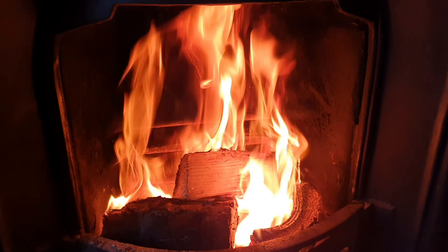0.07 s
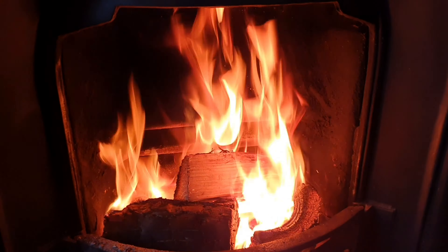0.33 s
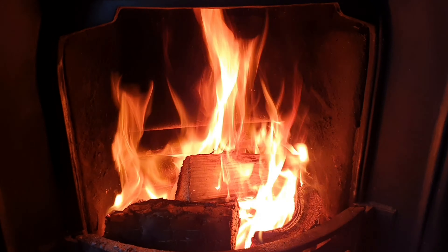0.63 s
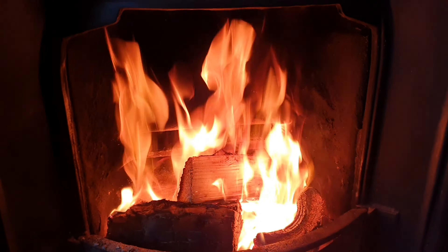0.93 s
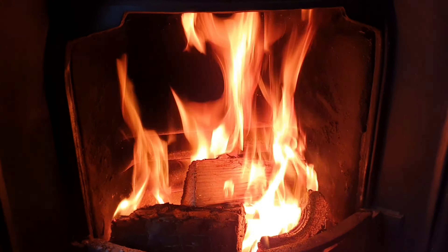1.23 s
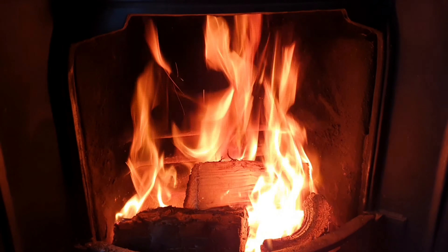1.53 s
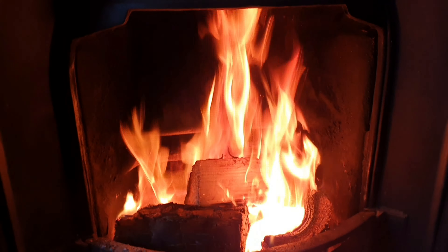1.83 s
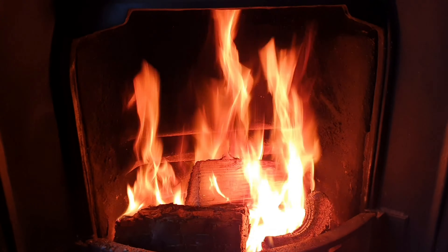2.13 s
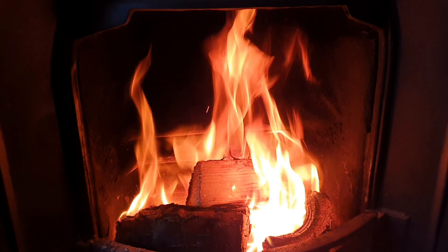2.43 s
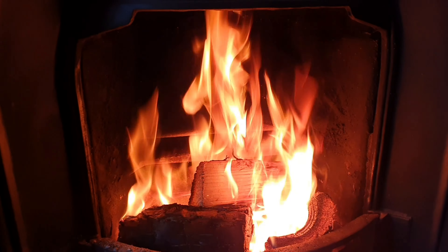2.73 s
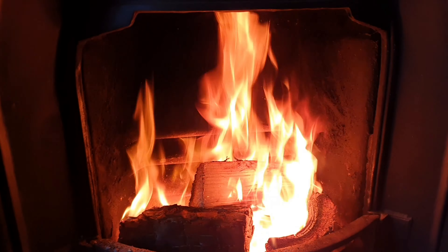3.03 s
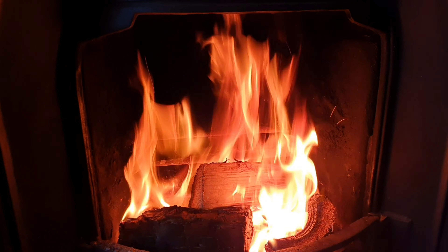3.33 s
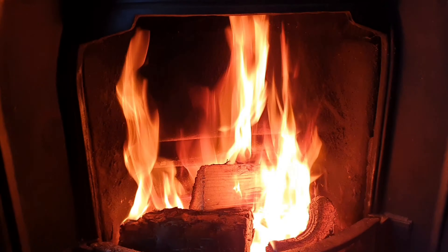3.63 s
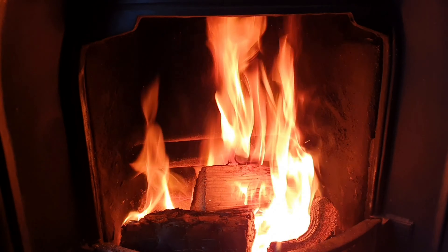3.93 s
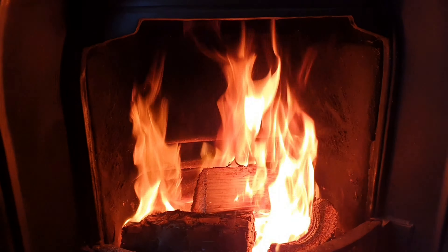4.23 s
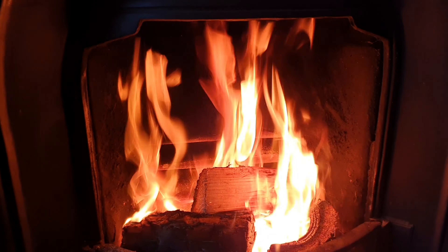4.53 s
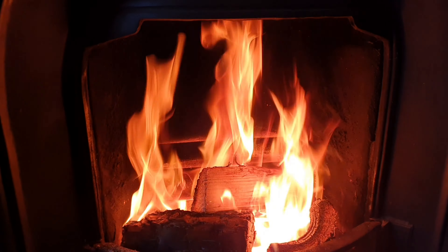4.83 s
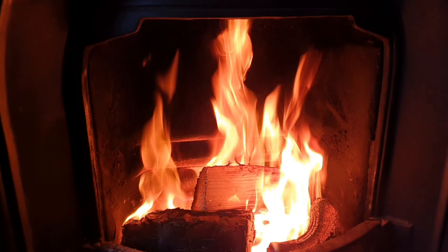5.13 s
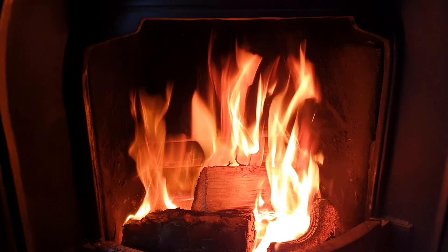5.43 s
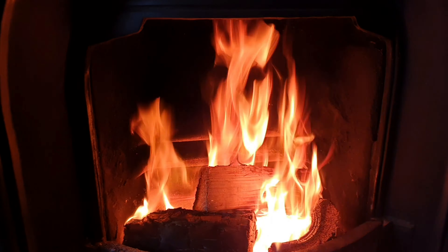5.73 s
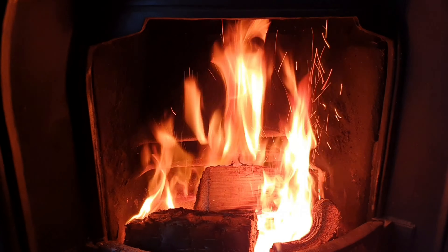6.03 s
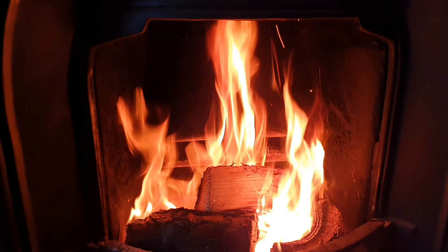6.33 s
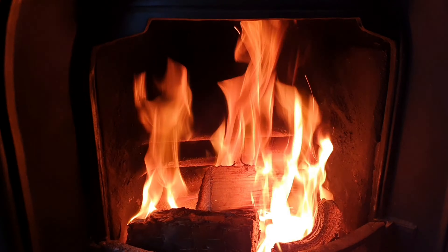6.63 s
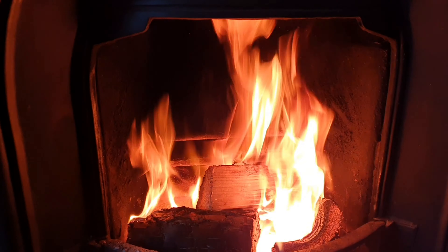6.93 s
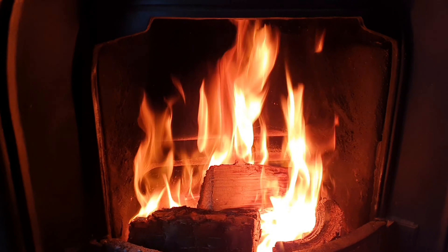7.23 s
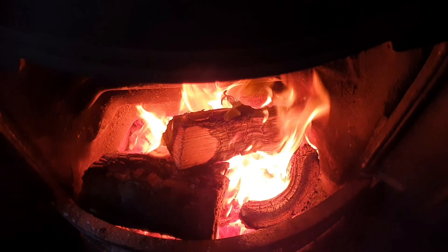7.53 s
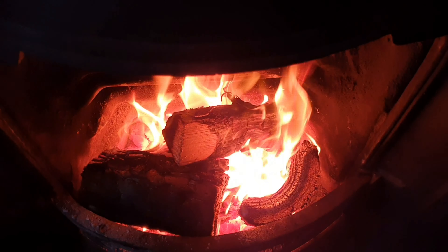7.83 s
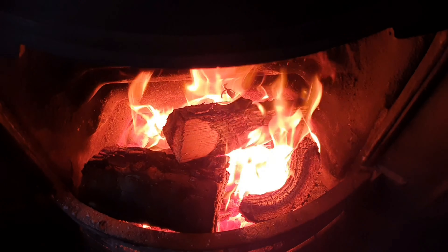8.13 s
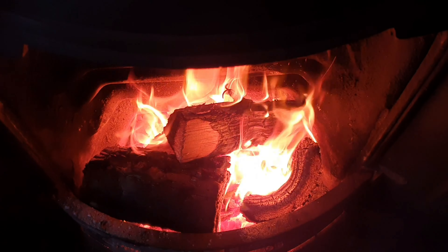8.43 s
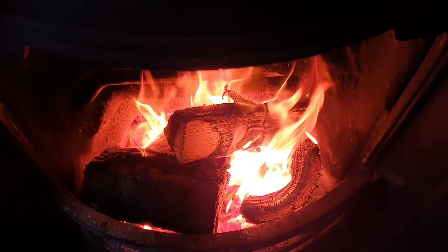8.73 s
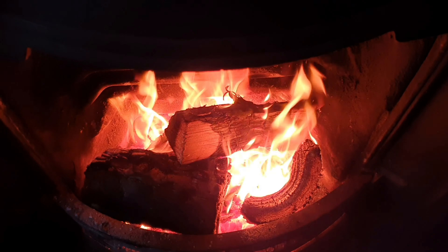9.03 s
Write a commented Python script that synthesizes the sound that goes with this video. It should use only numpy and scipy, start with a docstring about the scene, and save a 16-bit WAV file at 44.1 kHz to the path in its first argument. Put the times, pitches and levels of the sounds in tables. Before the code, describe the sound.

A log fire burns in a small iron fireplace, heard close by in a living room for about nine seconds. A soft, low rumble of flames flutters throughout, swelling in gentle whoomps, most clearly between 3.3 and 3.9 seconds. Above it are a faint hiss and the fine sizzle of sap. Short, bright cracks come irregularly from the left with a little room reverberation, standing out around 0.7, 1.6, 3 and 3.8 seconds; some have a tiny woody ring. At about 5.8 seconds comes a sharp double pop, by far the loudest sound. Lighter crackles follow, with a flare near 6.8 seconds and another clear crack at 7.4. At 7.6 seconds the sound drops out for an instant. The fire then continues quieter and duller, with a few small cracks and a soft flare near 8.8 seconds.

```python
"""Logs burn in a small iron fireplace, heard from close by in a living room.
Turbulent flames excite the air resonances of the firebox, so it rumbles under their flutter. Pockets of
steam burst in the wood as a fine sizzle, sharp cracks and one loud double pop; splinters ring as they
split off. The cracks come from the left and reverberate in the room.
Near the end, after a brief dropout, the fire sounds quieter and duller."""
import sys
import numpy as np
from scipy import signal
from scipy.fft import rfft, irfft, next_fast_len
from scipy.io import wavfile
from scipy.ndimage import uniform_filter1d, minimum_filter1d

SR = 44100
rng = np.random.default_rng(int(sys.argv[2]) if len(sys.argv) > 2 else 0)


def persist_wave(psi):
    """Save psi, clipped to +-1, as 16-bit WAV."""
    counts = np.round(np.clip(psi, -1, 1) * 32767).astype(np.int16)
    wavfile.write(sys.argv[1], SR, np.atleast_2d(counts).T)


N = 408789
TIME = np.arange(N) / SR
DROPOUT_AT_S, DROPOUT_LENGTH_S = 7.597, .011

# steam pockets bursting in the wood: (time [s], level referred to 1 ms [dB], tilt [dB/octave],
# decay time of the tearing [ms], centre of a broad lift in the crack's tone [Hz], its gain [dB]);
# at 1500 Hz the lift gives bright cracks body
STEAM_BURSTS = [(0.1855, -46.5, 3.5, 1.3, 8800.0, 7), (0.3887, -35, 9.5, 1.4, 5600.0, 6),
                (0.4107, -39.5, 1.5, 1.7, 7700.0, 4), (0.4465, -43.5, 0.5, 1.6, 2100.0, 7.5),
                (0.528, -27, 10.5, 2.3, 13800.0, 0), (0.5889, -40, 6, 2.5, 1500.0, 3),
                (0.6716, -24.5, 2.5, 0.89, 13800.0, 2.5), (0.747, -43.5, 11, 1.8, 8100.0, 5),
                (0.9261, -34.0, 1, 2.1, 14500.0, 7), (0.9306, -32.5, 0.0, 1.7, 13800, 3),
                (1.003, -44, 1, 0.58, 8600, 14), (1.008, -41.5, -0.5, 1.3, 5600.0, 4),
                (1.1318, -33, 8, 0.98, 13300, 6.0), (1.298, -46, 2, 1.1, 10300.0, 5),
                (1.346, -46.5, 2.5, 5.2, 13800.0, 3), (1.4005, -39.5, 3, 1.7, 5400.0, 4),
                (1.4856, -33.5, 3.5, 2.1, 6960, 6), (1.52, -43, 5, 1.3, 9300.0, 4),
                (1.5815, -18.5, 5.5, 0.82, 3700.0, 0), (1.729, -45, 7, 1.4, 14500.0, 8.0),
                (1.742, -49, 4, 2.5, 4400.0, 5), (1.7753, -34.5, 3.5, 1.1, 14500.0, 6),
                (2.212, -45.5, 4, 2.9, 9400.0, 10), (2.2288, -31.5, 3.5, 2.9, 9000.0, 4),
                (2.446, -36.5, 4, 2.5, 10700, 4), (2.4934, -31.5, 5.5, 2.2, 3160, 6.5),
                (2.518, -42, 9, 1.5, 1800.0, 9), (2.542, -44, -2, 0.26, 6630, 6),
                (2.758, -43.5, 8, 6.6, 14000.0, 8), (2.9048, -42, 9, 6.5, 1500.0, 13),
                (3.0185, -23, 8.5, 2.6, 3900.0, 2.0), (3.118, -37.5, 13, 3.8, 1500.0, 5.0),
                (3.1443, -31.5, 1, 1.4, 13600.0, 6), (3.207, -43.5, 3, 1.4, 14500.0, 1),
                (3.4519, -33.5, 1.5, 1.4, 14500.0, 10), (3.587, -45.5, 4.5, 3, 7700.0, 8),
                (3.69, -46, 4, 2.4, 14500.0, 3.0), (3.7043, -36.5, 10, 2.4, 1500.0, 7.0),
                (3.78, -25, 12, 2.1, 1500.0, 9), (3.849, -24.5, 5.5, 1.16, 5170, -0.5),
                (4.031, -28.5, 6, 1.8, 2500.0, 1.5), (4.0826, -33, 4.5, 1, 9900, -1),
                (4.1853, -33.5, 2.5, 1.8, 13800.0, 5), (4.3652, -42.0, -3, 1.2, 6600, 6),
                (4.512, -34, 6.5, 2.1, 7440, 4.5), (4.549, -39.5, 7.5, 3.2, 9400.0, 4),
                (4.639, -44, 10.0, 3.6, 1800.0, 7), (4.6603, -37, 15.5, 2.1, 7300.0, -1),
                (4.967, -39.5, 9.5, 4.1, 6130, 4.0), (5.049, -44, 8.5, 3.3, 1500.0, 4.0),
                (5.2035, -40.5, 5.5, 3.0, 14200.0, 8.0), (5.214, -43, 5, 2.5, 6800.0, 4.0),
                (5.273, -36.5, 9, 2.4, 9600, 7.5), (5.3472, -47.5, -2, 2.8, 13900.0, 9.0),
                (5.3909, -36.5, -1.0, 0.9, 6640, 2), (5.687, -28.5, 3.5, 2.2, 4900, 11.5),
                (5.705, -37.5, 5, 2, 4300.0, 10), (5.756, -42.5, 13.5, 1.5, 1500.0, 14),
                (5.818, 0, 3.5, 1.17, 3000.0, 3), (5.828, -16.5, 12, 3.8, 1700.0, 12.0),
                (5.8346, -14.5, 2.0, 15.4, 5700.0, 3.5), (5.9098, -3.5, 0.5, 0.55, 14630, 3.5),
                (6.1403, -34.5, 3, 1.85, 11100, 4), (6.2993, -50, 8, 3.9, 9680, 7),
                (6.3262, -44, 15, 3.2, 1500.0, 5), (6.49, -48.5, 1, 1.9, 7200.0, 7),
                (6.503, -47.5, 0.0, 1.64, 1510, 3.0), (6.5914, -39.5, 15, 4.9, 4550, 0),
                (7.0411, -43.0, 2.5, 2.5, 13700, 13.5), (7.3499, -43, 0.0, 3.2, 5040, 6),
                (7.378, -21, 3.0, 1.34, 12200, 3.5), (7.3914, -30, 0.5, 0.71, 5900.0, 4.0),
                (7.5742, -42.5, 8, 0.63, 1500.0, 21), (7.5938, -42, -3, 0.11, 13060, 11),
                (8.1055, -38.5, 7.5, 1.7, 3200.0, 12), (8.1923, -51.0, -1.5, 3, 8790, 4.0),
                (8.3043, -34.0, 15.5, 2.4, 1500.0, 4), (8.8097, -48.0, 1.5, 1.9, 6480, 11),
                (8.841, -50, -0.5, 4.7, 3980, 5.5), (8.8872, -42, 6, 0.89, 14500.0, 10)]
# spectrum of fluttering flames: (frequency [Hz], relative level [dB])
FLUTTER_SPECTRUM = [(150, -13.5), (260, -8), (300, -5.5), (350, 2), (440, -4.5), (560, -9.5), (780, -12.5),
                    (1100, -21.5), (2000, -27.5), (4000, -39.5), (9000, -54.5)]


def from_db(db):
    """Amplitude ratio of a level in decibels."""
    return 10 ** (np.asarray(db) / 20)


def unit_rms(x):
    """Normalisation to an rms of 1."""
    return x / np.sqrt(np.mean(x ** 2) + 1e-20)


def steadied(x, span_s):
    """Division by the running rms holds a stereo sound's short-time level near 1."""
    return x / np.sqrt(uniform_filter1d(np.mean(x ** 2, axis=0), int(span_s * SR)) + 1e-20)


def in_time(rows):
    """Linear interpolation of a curve at every sample."""
    return np.interp(TIME, *np.transpose(rows))


def at_hz(points, hz):
    """Interpolation on a logarithmic frequency axis."""
    known_hz, values = np.transpose(points)
    return np.interp(np.log(np.maximum(hz, 1)), np.log(known_hz), values)


def bins(size):
    """Frequencies of the Fourier transform of `size` samples."""
    return np.fft.rfftfreq(size, 1 / SR)


def colour(x, spectrum):
    """Minimum-phase filtering: folding the cepstrum gives a causal response with this spectrum."""
    cepstrum = irfft(np.log(from_db(at_hz(spectrum, bins(2048)))))
    fold = np.r_[1, np.full(1023, 2), 1, np.zeros(1023)]
    response = irfft(np.exp(rfft(cepstrum * fold)))
    return signal.oaconvolve(x, response[None], axes=-1)[:, :x.shape[-1]]


def pan(db):
    """Constant-power gains for a level difference of left over right."""
    ratio = from_db(db)
    return np.array([ratio, np.ones_like(ratio)]).reshape(2, -1) / np.sqrt(1 + ratio ** 2)


def drift(corner_hz):
    """Low-passed noise: a slow random fluctuation of unit rms."""
    step, settle = 40, 2000
    pole = np.exp(-2 * np.pi * corner_hz * step / SR)
    white = rng.standard_normal(N // step + settle + 2)
    slow = signal.lfilter([1], [1, -2 * pole, pole * pole], white)[settle:]
    return np.interp(np.arange(N) / step, np.arange(len(slow)), unit_rms(slow))


def air_noise():
    """Interaural coherence: noise alike at both ears in the bass, largely unrelated in the treble."""
    # likeness of the two ears' signals: (frequency [Hz], coherence [0-1])
    coherence = [(60, 1), (180, 1), (290, 0.96), (640, 0.4), (1400, 0.27), (3000, 0), (15000, 0.3)]
    # balance between the ears: (frequency [Hz], left over right [dB])
    balance = [(60, 1.2), (120, 1.2), (250, 3.1), (700, 2), (2400, 2.2), (8000, 4.3)]
    size = next_fast_len(N, True)
    mid, side = rfft(rng.standard_normal((2, size)))
    hz = bins(size)
    alike = np.clip(at_hz(coherence, hz), 0, .995)
    ears = np.sqrt(1 + alike) * mid + np.sqrt(1 - alike) * side * [[1], [-1]]
    return irfft(ears * pan(at_hz(balance, hz)))[:, :N]


def firebox(x, band_hz=(41, 270)):
    """Cavity resonance: the low modes of the enclosed air respond as parallel damped resonators."""
    # air modes of firebox and room: (frequency [Hz], bandwidth [Hz], gain [dB])
    air_modes = [(46.3, 12, -6.5), (69, 10, 1.5), (84, 12, -5), (114.6, 18, -7.5), (149.6, 16, -11.5),
                 (166, 17, -12.5), (200.6, 12, -13), (225, 19, -16)]
    out = 0
    for k, (hz, width_hz, db) in enumerate(air_modes):
        radius = np.exp(-np.pi * width_hz / SR)
        forward = np.array([1, 0, -1]) * (1 - radius ** 2) / 2
        feedback = [1, -2 * radius * np.cos(2 * np.pi * hz / SR), radius ** 2]
        out = out + (-1) ** k * from_db(db) * signal.lfilter(forward, feedback, x)
    return signal.sosfilt(signal.butter(2, band_hz, "band", fs=SR, output="sos"), out)


def draught(roar_share=.73, waver_db=0.53, rise_s=0.049, fall_s=0.05):
    """Amplitude modulation: levels [dB] of boom, roar and flutter waver and swell with each flare."""
    # strength of the draught through the flames: (time [s], level [dB])
    airflow = [(0.7, -45.5), (0.95, -48), (1.3, -45.5), (1.85, -42.5), (2.15, -47.5), (3.0, -44.5),
               (3.75, -50), (4.2, -45), (4.77, -52.5), (4.92, -43.5), (5.3, -43.5), (5.7, -45),
               (6.05, -43.5), (6.35, -55), (6.65, -53), (7.05, -53), (7.56, -43.5), (7.7, -58),
               (8.3, -58.5), (8.75, -52), (9.27, -54)]
    # fluttering of the flame tongues: (time [s], level [dB])
    tongues = [(0.5, -67.5), (1.05, -72), (1.4, -68), (2.3, -68.5), (3.0, -66), (3.35, -69.5), (4.1, -70),
               (4.75, -72.5), (5.3, -68.5), (5.57, -71.5), (6.4, -75), (7.0, -76), (7.55, -67),
               (7.75, -80.5), (8.4, -79), (8.85, -70.5), (9.27, -74.5)]
    # flares, each a soft whoomp: (time [s], boom gain [dB], roar gain [dB], flutter gain [dB])
    flares = [(.07, 6, 2.5, 2), (.31, 7, 2, 2.5), (.61, 7.5, 5.5, 7), (1.2, 0, 4.5, 7.5), (1.58, -1, 5, 7),
              (1.9, -2, 2, 3.5), (2.03, -5, 6, 5), (2.28, 5.5, 1, -3), (2.5, 8, -1, 2.5),
              (2.72, -4.5, 3, -0.5), (2.84, 7.5, 3.5, 1), (3.08, 6, -1.5, -6), (3.278, 9.5, 6, 1.5),
              (3.62, 9, 9, 7.5), (3.903, 9.5, 14, 9.5), (4.19, -14, 3.5, 8.5), (5.05, 3.5, -2.5, 8),
              (5.13, 4, 6, 7.5), (5.889, 8, 6.5, 2), (6.761, 5.5, 12, 8.5), (7.149, -2, 2, 0.5),
              (7.399, -5.5, 7.5, 2), (7.56, 2, 5, 3), (8.83, 6.5, 5.5, 1)]
    boom_db = in_time(airflow)
    roar_db = boom_db.mean() + roar_share * (boom_db - boom_db.mean())
    levels = np.array([boom_db, roar_db, in_time(tongues)]) + waver_db * drift(corner_hz=5.9)
    for s, *flare_db in flares:
        peak = int(s * SR)
        near = slice(max(peak - SR // 4, 0), peak + SR // 4)
        t = TIME[near] - s
        swell = np.exp(-(t / np.where(t < 0, rise_s, fall_s)) ** 2)
        levels[:, near] += np.outer(flare_db, swell)
    return levels


def flames(boom_gain_db=-2, roar_gain_db=-6, lumpy_db=2, flicker_db=2.5, split_hz=100):
    """Combustion noise: turbulent burning comes in lumps, driving a deep boom, a roar and a flutter."""
    lumps = drift(corner_hz=22)
    rumble = firebox(air_noise() * from_db(lumpy_db * lumps))
    crossover = [signal.butter(4, split_hz, kind, fs=SR, output="sos") for kind in ("low", "high")]
    boom, roar = (steadied(signal.sosfilt(band, rumble), span_s=0.18) for band in crossover)
    flutter = unit_rms(colour(air_noise(), FLUTTER_SPECTRUM) * from_db(flicker_db * lumps))
    boom_db, roar_db, flutter_db = draught()
    return (boom * from_db(boom_db + boom_gain_db) + roar * from_db(roar_db + roar_gain_db)
            + flutter * from_db(flutter_db))


def ticks(per_s, spread_db, decay_s, side_db, clump_db, low_hz, peak_db, high_hz=15000, scatter_db=4):
    """Shot noise: tiny bursts of random size and place arrive in clumps; the sum has unit rms."""
    # spectrum of boiling sap: (frequency [Hz], gain [dB])
    sap_spectrum = [(700, -13.5), (1500, -8.5), (2600, -13), (3700, -5), (4500, -16), (5600, -8.5),
                    (7500, -8.5), (9800, -2.5), (12000, -5.5), (14000, 0), (16000, -6)]
    born = rng.random(N) < per_s * from_db(clump_db * drift(corner_hz=8)) / SR
    sizes = from_db(spread_db * np.minimum(rng.exponential(1, N), 2.7)) * rng.choice([-1, 1], N)
    clicks = born * sizes * pan(side_db + scatter_db * rng.standard_normal(N))
    spot_count, out = 10, 0
    spot = rng.integers(0, spot_count, N)
    t = np.arange(256) / SR
    for k, hz in enumerate(np.linspace(low_hz, high_hz, spot_count)):
        # every spot on the logs favours its own pitch
        resonance = [(hz / np.sqrt(2), 0), (hz, peak_db), (hz * np.sqrt(2), 0)]
        tick = colour(rng.standard_normal((2, len(t))) * np.exp(-t / decay_s), resonance)
        out = out + signal.oaconvolve(clicks * (spot == k), unit_rms(tick), axes=-1)[:, :N]
    return unit_rms(colour(out, sap_spectrum))


def sizzle(tick_db=1, fizz_db=0.5, room_db=-7, vigour_share=0.35):
    """Boiling: sap bursts as ticks over a dense fizz; the harder it boils, the more they stand out."""
    # sap boiling out of the logs: (time [s], level [dB])
    boiling = [(0, -70), (0.85, -76.5), (1.5, -71), (2.1, -73), (3.4, -75), (4.05, -70.5), (4.85, -77.5),
               (5.25, -72.5), (5.6, -78.5), (7.2, -79.5), (7.57, -71.5), (7.64, -81), (8.6, -79),
               (9.27, -74.5)]
    sparse = ticks(per_s=65, spread_db=5.6, decay_s=.0005, side_db=10, clump_db=5,
                   low_hz=7000, peak_db=8)
    fizz = ticks(per_s=900, spread_db=0.5, decay_s=.0016, side_db=17, clump_db=4,
                 low_hz=4500, peak_db=4.5)
    boil_db = in_time(boiling)
    tick_gain = from_db(tick_db + vigour_share * (boil_db - boil_db.mean()))
    reverberation = room(from_db(room_db) * sparse[:1])
    return from_db(boil_db) * (tick_gain * (sparse + reverberation) + from_db(fizz_db) * fizz)


def room(feed, build_s=0.002, hold_s=0.026, side_db=9.5):
    """Reverberation: reflections build up, hold while the first walls answer, then die, the bass last."""
    # decay of the room: (frequency [Hz], reverberation time T60 [s])
    decay_times = [(200, 0.91), (900, 0.42), (2500, 0.28), (6000, 0.31), (15000, 0.32)]
    # spectrum of the reflections: (frequency [Hz], gain [dB])
    room_spectrum = [(100, 0), (350, -1), (500, 2.5), (700, 3), (1100, 1), (1600, 4), (2250, 4.5),
                     (3100, 1), (4200, 1.5), (6000, -0.5), (10000, -5.5), (16000, -8.5)]
    t = np.arange(int(.8 * SR)) / SR
    noise_spectrum = rfft(rng.standard_normal((2, len(t))))
    centres_hz, t60s = np.transpose(decay_times)
    tail = 0
    for centre_hz, t60 in zip(centres_hz, t60s):
        share = at_hz(np.c_[centres_hz, centres_hz == centre_hz], bins(len(t)))
        band = irfft(noise_spectrum * share, len(t))
        tail = tail + band * from_db(-60 * np.maximum(t - hold_s, 0) / t60)
    build_up = 1 - np.exp(-t / build_s)
    response = unit_rms(colour(tail * build_up, room_spectrum)) / np.sqrt(len(t))
    return pan(side_db) * signal.oaconvolve(feed, response, axes=-1)[:, :N]


def hiss(level_db=-81):
    """Stationary broadband noise: a faint, even hiss behind the fire."""
    # spectrum of the hiss: (frequency [Hz], relative level [dB])
    hiss_spectrum = [(200, 5.5), (1000, 5.5), (2500, 7), (5500, 1.5), (7700, -2.5), (10500, 6),
                     (13500, -1.5), (16000, -1.5)]
    return from_db(level_db) * unit_rms(colour(air_noise(), hiss_spectrum))


def cracks(snap_db=5, rattle_db=-18.5, rattle_s=.006, fibre_s=.0004, rough_db=3.5, grain_db=1.5,
           pivot_hz=8000, shelf_hz=1800, lift_width_hz=1100):
    """Fracture: each pocket snaps, tears and rattles in the firebox; gives direct sound and room feed."""
    # spectrum common to all cracks: (frequency [Hz], gain [dB])
    crack_spectrum = [(200, -2.5), (500, -12.5), (750, -5.5), (1050, -5.5), (1700, -4.5), (2300, -4),
                      (2900, -0.5), (3800, 1), (4900, -4.5), (6400, -0.5), (8000, -3.5), (10000, 0.5),
                      (14000, -1.5), (16000, -4)]
    size, count = 2048, len(STEAM_BURSTS)
    t, hz = np.arange(size) / SR, bins(size)[1:]
    direct, feed = np.zeros((2, N + size)), np.zeros((1, N + size))
    noises = rng.standard_normal((count, 2, size))
    grain_hz = np.geomspace(700, 16000, 14)
    grains = grain_db * rng.standard_normal((count, len(grain_hz)))   # no two pockets are shaped alike
    yielding = rng.standard_normal((count, size))   # the fibres give way unevenly
    sides_db = 15.5 + 1.5 * rng.standard_normal(count)   # the pockets lie scattered on the left
    snap = from_db(snap_db) * 2 * (np.arange(size) == 2)
    rattle = from_db(rattle_db) * np.exp(-t / rattle_s)
    for k, (s, db, tilt, tear_ms, lift_hz, lift_db) in enumerate(STEAM_BURSTS):
        tear = np.exp(-t * 1e3 / tear_ms)
        fibres = from_db(rough_db * np.interp(t, np.arange(size) * fibre_s, yielding[k]))
        burst = snap + noises[k] * fibres * (tear + rattle)
        slope = tilt * np.log2(np.maximum(hz, shelf_hz) / pivot_hz)
        lift = lift_db * np.exp(-.5 * ((hz - lift_hz) / lift_width_hz) ** 2)
        tone_db = at_hz(crack_spectrum, hz) + slope + lift + at_hz(np.c_[grain_hz, grains[k]], hz)
        # the room gathers sound from all directions, so it gets the smooth spectrum of a plain snap
        paths = colour(np.vstack([burst, snap]), np.c_[hz, tone_db])
        energy = np.sum(paths ** 2, axis=1, keepdims=True)
        paths *= from_db(db) * np.sqrt(SR / 1000 / energy)
        # a longer tear fills the room more; the walls absorb thin, bright cracks most
        room_db = -9 + 4 * np.log2(tear_ms) - 0.077 * tilt
        at = int(s * SR)
        direct[:, at:at + size] += paths[:2] * pan(sides_db[k])
        feed[0, at:at + size] += paths[2] * from_db(room_db)
    return direct[:, :N], feed[:, :N]


def puffs(gain_db=-43, growth=0.057, tilt_loss=1.5, fade_s=0.034, threshold_db=-28, softness_db=3):
    """Impulse and relaxation: gas from a crack jolts the flames; big, dull cracks release the most."""
    s, db, tilt = np.transpose(STEAM_BURSTS)[:3]
    gas = from_db(gain_db + growth * db - tilt_loss * np.maximum(tilt, 0))
    holdback = 1.5 + np.exp((threshold_db - db) / softness_db)   # small cracks release next to none
    jolts = np.zeros(N)
    jolts[(s * SR).astype(int)] = gas / holdback
    swell = signal.lfilter([1], [1, -np.exp(-1 / (fade_s * SR))], jolts + 1e-18)
    return swell * unit_rms(colour(air_noise(), FLUTTER_SPECTRUM))


def wall_echo(x, delay_s=0.031, level_db=-23):
    """Specular reflection: one wall returns a delayed, weaker copy of each crack."""
    return from_db(level_db) * np.pad(x, [(0, 0), (int(delay_s * SR), 0)])[:, :N]


def splinters(rise_s=0.00041, side_db=11):
    """Damped vibration: splinters ring up as the wood tears; gives direct sound and room feed."""
    # modes of the splinters: (time [s], frequency [Hz], level of the decay envelope [dB], T60 [s])
    splinter_modes = [(0.4108, 1770, -48, .008), (0.4466, 1700, -34.5, 0.0039), (0.4471, 3820, -39, .007),
                      (0.672, 3850, -35, 0.0045), (0.9307, 3800, -30.5, 0.0076), (0.9313, 1980, -41, 0.011),
                      (1.4858, 3360, -42, .007), (1.5818, 4040, -27, 0.0049), (2.229, 9800, -12.5, 0.0021),
                      (2.2284, 4560, -32, 0.008), (2.2291, 1730, -32, 0.0026), (2.4934, 3530, -41.5, 0.014),
                      (2.4946, 3920, -52, .009), (3.0186, 7260, -26.5, 0.0052), (3.1446, 3740, -43, 0.0053),
                      (3.4507, 6300, -37, 0.006), (3.849, 3930, -34, 0.007), (3.849, 6200, -31, 0.0041),
                      (4.031, 6450, -31, 0.0055), (4.032, 3600, -45, 0.0048), (4.1851, 3840, -39.5, 0.013),
                      (4.1844, 1300, -40, 0.0025), (4.513, 8200, -36, 0.0058), (5.391, 3860, -34, 0.0049),
                      (5.818, 2430, -14, .002), (5.817, 3420, -19.5, .002), (5.817, 7000, -2.5, .002),
                      (5.837, 2480, -19, 0.0086), (5.9096, 3970, -10, 0.0044), (5.9097, 2306, -20, .003),
                      (6.491, 1770, -50, .007), (6.491, 6500, -42.5, 0.006), (7.377, 3990, -26, 0.0067),
                      (7.379, 2030, -36, .007), (7.379, 2670, -39, 0.0067), (7.378, 945, -33.5, 0.0089),
                      (7.3913, 895, -37, .007), (7.3915, 2450, -33, 0.0068), (8.1065, 2080, -48, .012),
                      (8.107, 2420, -49, .012), (8.1064, 3610, -41, 0.006), (8.1067, 4400, -42, 0.006),
                      (8.106, 6020, -48, .007), (8.842, 3684, -43, 0.018), (8.843, 2430, -56, 0.035),
                      (8.859, 3620, -52, 0.022)]
    # share of a ping that reaches the room: (frequency [Hz], gain [dB])
    room_share = [(2400, -10), (3700, -14), (6000, -20)]
    pings, t = np.zeros((1, N)), np.arange(SR // 10) / SR
    rise = 1 - np.exp(-t / rise_s)
    for s, hz, db, t60 in splinter_modes:
        at = int(s * SR)
        pings[0, at:at + len(t)] += from_db(db - 60 * t / t60) * rise * np.sin(2 * np.pi * hz * t)
    return pings * pan(side_db), colour(pings, room_share)


def limiter(x, ceiling_db=0, release_db_per_s=12000):
    """Peak limiting: a channel's gain falls just ahead of an overload and recovers in milliseconds."""
    excess_db = np.maximum(20 * np.log10(np.abs(x) + 1e-9) - ceiling_db, 0)
    release_db = release_db_per_s * TIME
    cut_db = np.maximum.accumulate(excess_db + release_db) - release_db
    return x * from_db(uniform_filter1d(minimum_filter1d(-cut_db, size=17), size=17))


def dulled_ending(fire):
    """Filtering: after the dropout the fire sounds duller, with less deep boom and top treble."""
    # change of tone after the dropout: (frequency [Hz], gain [dB])
    tone_change = [(30, 1), (50, 1.5), (70, -4), (105, 4), (145, -3), (240, 3.5), (310, -1), (1000, -1.5),
                   (2500, -4), (5500, 0.5), (7600, -3.5), (11000, 0.5), (14500, -7.5)]
    return np.where(TIME < DROPOUT_AT_S + DROPOUT_LENGTH_S / 2, fire, colour(fire, tone_change))


def scene():
    """Superposition: flames, sizzle, cracks and their reflections add up over a faint hiss."""
    snaps, crack_feed = cracks()
    pings, ping_feed = splinters()
    reflections = wall_echo(snaps) + room(crack_feed + ping_feed)
    return dulled_ending(hiss() + flames() + puffs() + sizzle() + snaps + pings + reflections)


def record(dry, cutoff_hz=15750):
    """A gate makes the brief dropout, a limiter holds the loudest pop and a low-pass cuts the top."""
    audible = (TIME < DROPOUT_AT_S) | (TIME > DROPOUT_AT_S + DROPOUT_LENGTH_S)
    gate = uniform_filter1d(audible.astype(float), size=64)
    limited = np.array([limiter(channel) for channel in dry * gate])
    return signal.sosfilt(signal.ellip(10, .1, 80, cutoff_hz, fs=SR, output="sos"), limited)


dry = scene()
out = record(dry)
persist_wave(out)
```